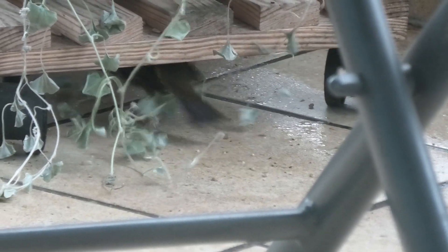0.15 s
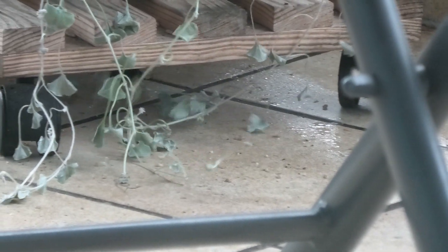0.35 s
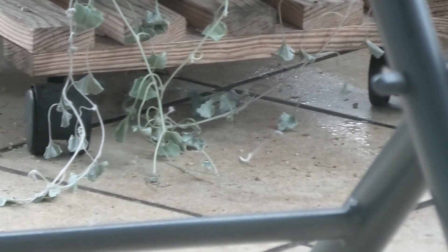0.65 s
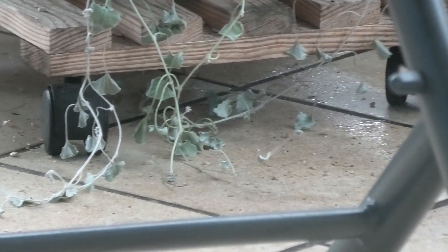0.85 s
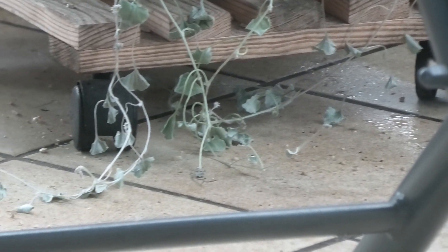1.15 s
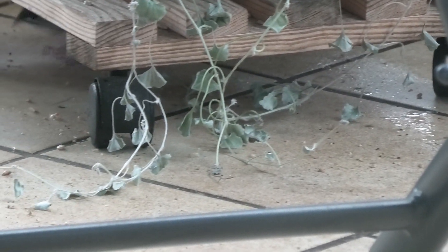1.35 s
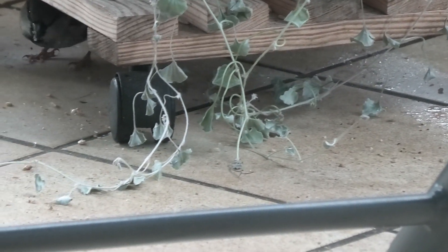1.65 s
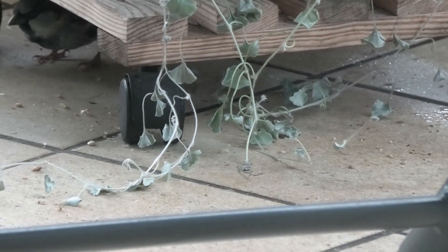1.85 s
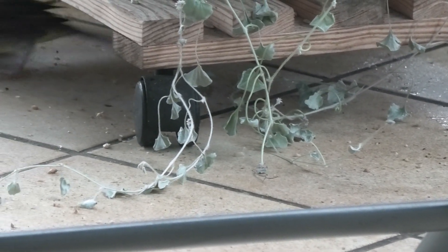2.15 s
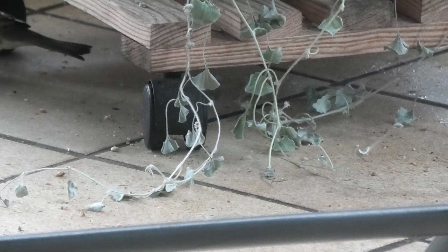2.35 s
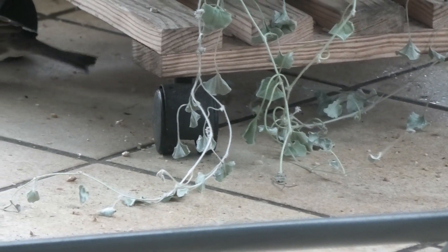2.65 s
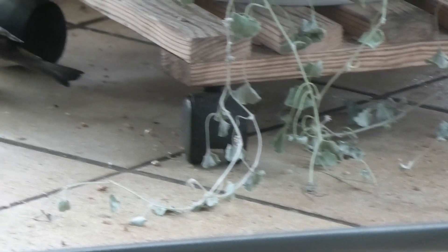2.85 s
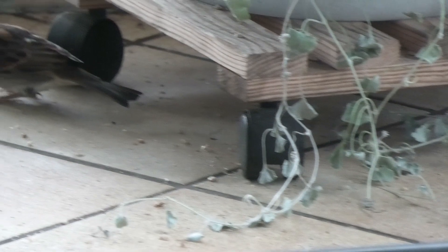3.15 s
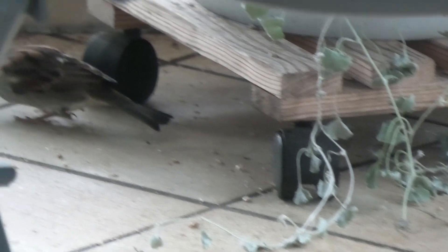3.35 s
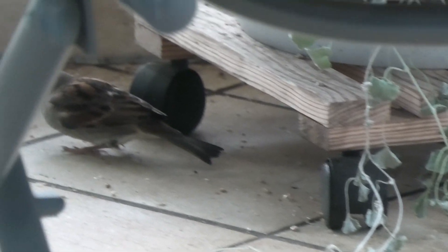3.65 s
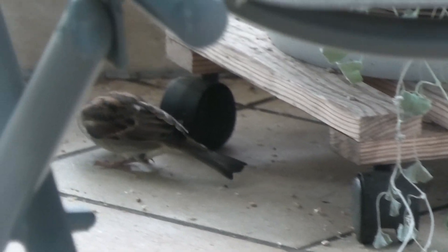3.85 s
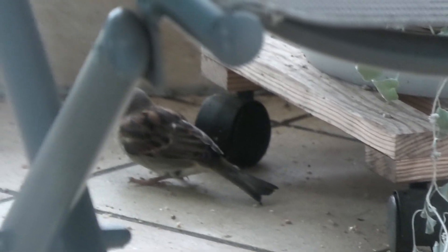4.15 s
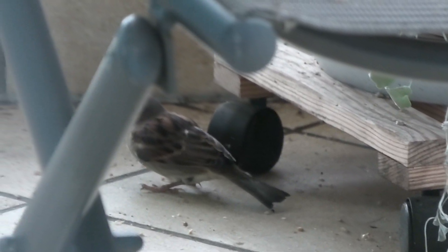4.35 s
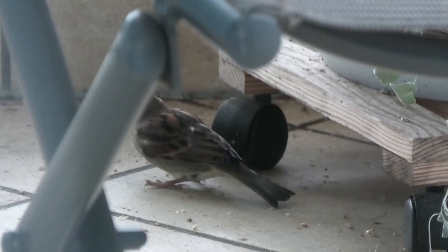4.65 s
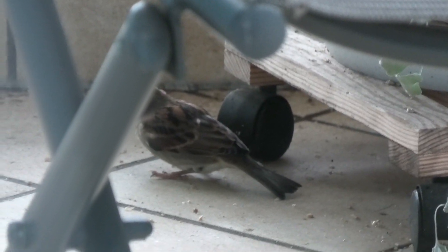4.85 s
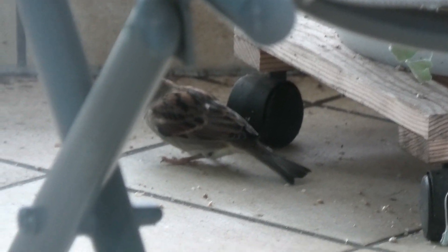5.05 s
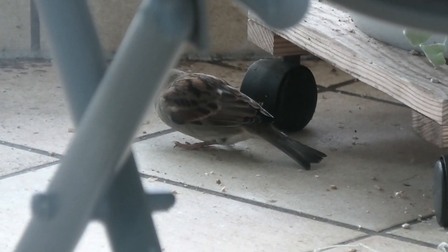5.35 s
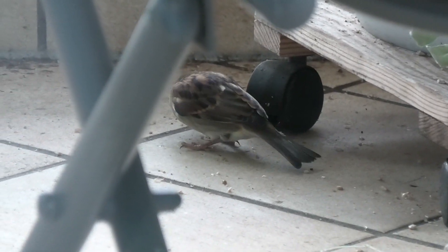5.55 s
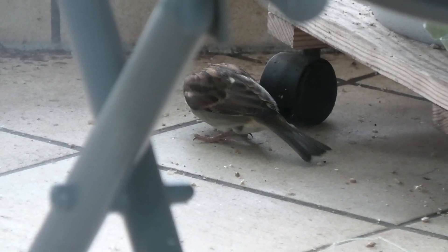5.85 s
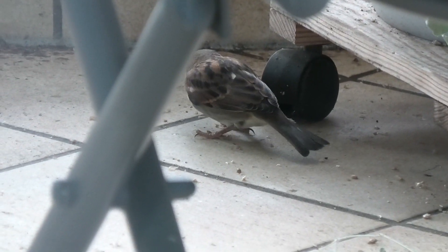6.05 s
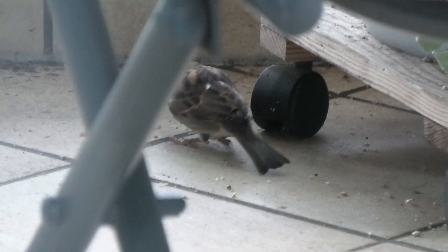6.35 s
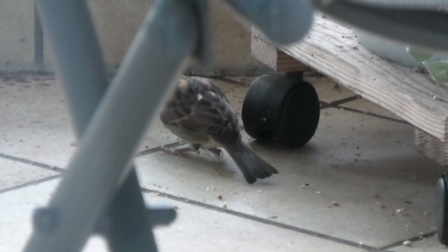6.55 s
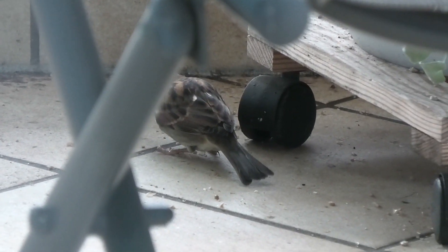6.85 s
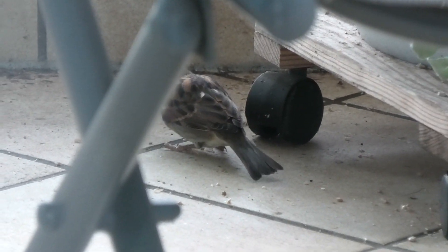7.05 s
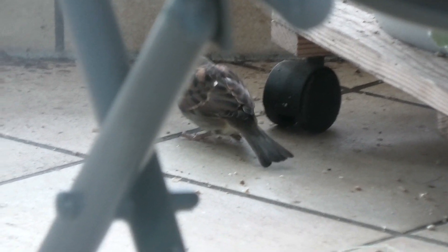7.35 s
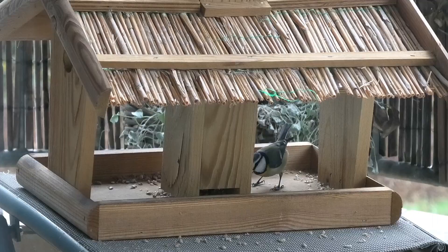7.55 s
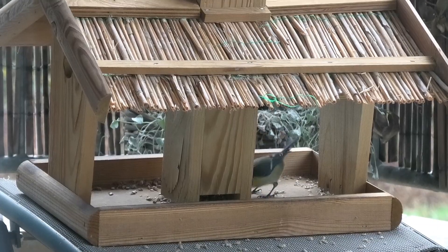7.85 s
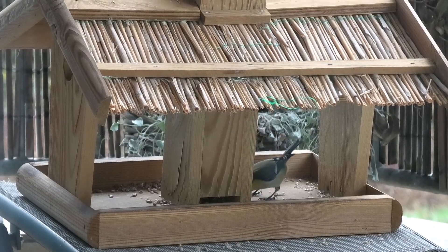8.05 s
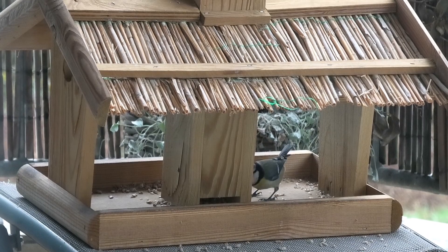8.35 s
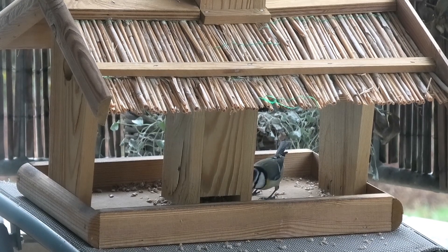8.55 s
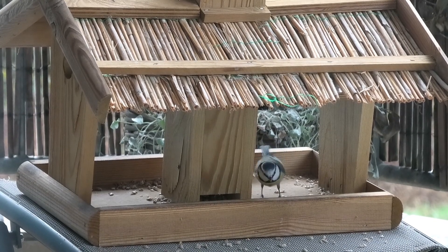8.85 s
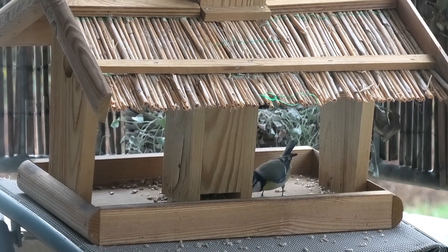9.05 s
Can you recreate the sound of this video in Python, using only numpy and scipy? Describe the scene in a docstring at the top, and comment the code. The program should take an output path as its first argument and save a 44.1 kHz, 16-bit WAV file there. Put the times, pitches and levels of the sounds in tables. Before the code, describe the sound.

Outdoor stereo ambience on a tiled balcony, with a soft low hush of distant town and leaves. From 0 to 1.6 s a bird repeats a springy looping chirp about five times a second, with tiny clipped notes and very high sizzles between. From 1.1 to 2.7 s come quick chatter, thin high whistles, trills and a long falling glide. From 2.7 to 3.7 s it is quieter: faint distant twitter and small grainy scuffs, the sharpest at 3.64. At 3.9-4.8 s sharp peeps and hooked chirps alternate. A mellow, rounded blackbird phrase flutes from 5.1 to 6.6 s, joined by rapid ticking from 5.9, then stuttering warbles and raspy squeaks until 7.6. There the hush abruptly changes character. Thin high arched tit calls follow until 8.35, then a brief lull, and from 8.5 to 9 s a crisp burst of whipping chirps and twitter.

```python
"""Songbirds sing around a balcony: several repeat loops, hooks and whips in bursts, a blackbird flutes, others
whistle, trill and twitter. Each note is a gliding syrinx tone with overtones, some with a little hiss.
The garden answers every note, and the house wall answers all but the blackbird's.
Something scuffs on the tiles as shaped noise; a soft outdoor hush of coloured noise lies under it all."""
import sys
import numpy as np
from scipy import signal
from scipy.fft import rfft, irfft, next_fast_len
from scipy.io import wavfile
from scipy.ndimage import uniform_filter1d

SR = 44100
rng = np.random.default_rng(int(sys.argv[2]) if len(sys.argv) > 2 else 0)


def output_pcm(signal):
    """Save a mono or channel-first signal as 16-bit PCM at the path in sys.argv[1].

    Samples are clipped to [-1, 1] before scaling.
    """
    pcm = np.clip(np.atleast_2d(signal).T, -1, 1) * 32767
    wavfile.write(sys.argv[1], SR, np.round(pcm).astype(np.int16))


N = 405279

TOP_HZ = 15800  # upper edge of overtones and of the final low-pass
ONSET_DB, ENDING_DB = -16, -16  # a held note starts and ends this far under its held level
CONTOUR_POINTS = 200


def undb(db):
    """Decibels to gain."""
    return 10 ** (np.asarray(db) / 20)


def unit(x):
    """Scale to rms 1."""
    return x / np.sqrt(np.mean(x ** 2))


def add(bus, x, start_s):
    """Mix a sound into a bus at a time."""
    at = int(round(start_s * SR))
    first, last = max(at, 0), min(at + x.shape[-1], N)
    bus[..., first:last] += x[..., first - at:last - at]


def walk(size, rate):
    """Random values joined by lines, rate of them a second."""
    place = np.arange(size) * rate / SR
    points = rng.standard_normal(4096)
    return np.interp(place, np.arange(len(points)), points)


def colour(points, hz):
    """Gain of a (Hz, dB) spectrum at given frequencies."""
    f, db = np.transpose(points)
    return undb(np.interp(np.log(hz + 1), np.log(f), db))


def sing(bus, voice, contour):
    """A syrinx tone follows its contour and wavers; bus rows are left, right and the share sent to the garden."""
    # bird voices: left minus right/dB, garden send/dB, 2nd harmonic/dB, upper harmonics before ring and tilt/dB
    voices = { "looper": (-4.5, -10.5, -43.5, -50), "chatter": (1.5, -8.5, -32, -36.5),
              "ticker": (0, -8.5, -27, -38), "whipper": (-2.5, -2.5, -11, -40),
              "blackbird": (8, -12, -41, -41), "rasp": (4.5, -8, -15, -26),
              "whistler": (10.5, -2.5, -24.5, -37), "glider": (8.5, -2, -25, -50),
              "sizzler": (-6, -6.5, -50, -50), "far": (3.5, 2, -52, -53), "tit": (4, -7.5, -45, -50),
              "nasal": (-5, -3, 4.5, 12), "scolder": (-3, -1, -33, -48), }
    # fast pitch tremble of the harsh voices: depth/share of pitch, rate/Hz
    harsh = {"rasp": (.035, 900), "sizzler": (.028, 1500), "whipper": (.025, 900), "ticker": (.012, 600),
             "glider": (.009, 500), "far": (.014, 250), "scolder": (.02, 1500), "tit": (.009, 120),
             "chatter": (.012, 400), "whistler": (.006, 400)}
    # hiss of air through the beak: level before its band filter, against the tone/dB
    air_db = {"blackbird": -32, "rasp": -12, "chatter": -34, "ticker": -26, "whipper": -18}
    ring_hz, ring_width_hz, ring_db = 10500, 1300, 15  # overtones ring in the beak
    blur_rad, blur_hz = .45, 1100  # phase jitter makes overtones breathy
    wall_delay_s, wall_db = (.011, .0071), -13  # echo at the left and right ear

    pan_db, echo_db, second_db, upper_db = voices[voice]
    wobble, wobble_hz = harsh.get(voice, (.003, 300))  # clear voices barely waver
    s, pitch, level_db = np.transpose(contour)
    t = np.arange(s[0], s[-1], 1 / SR)
    glide = uniform_filter1d(np.interp(t, s, pitch), size=90)
    hz = glide * (1 + wobble * walk(len(t), wobble_hz))
    phase = 2 * np.pi * np.cumsum(hz) / SR
    tone = np.sin(phase) * np.minimum(hz / 1600, 1) ** 12  # a small beak radiates no low fundamental

    for k in range(2, 7):
        ring = ring_db * np.exp(-((k * hz - ring_hz) / ring_width_hz) ** 2)
        overtone_db = second_db if k == 2 else upper_db + ring - 0.58 * k
        grain_db = 4 * walk(len(t), 500)  # overtones are raspier than the fundamental
        blur = blur_rad * walk(len(t), blur_hz)
        overtone = np.sin(k * phase + blur) * (k * hz < TOP_HZ)
        tone += undb(overtone_db + grain_db) * overtone

    if voice in air_db:
        band = signal.butter(2, (6000, 11500), "bandpass", fs=SR, output="sos")
        tone += undb(air_db[voice]) * signal.sosfilt(band, rng.standard_normal(len(t)))

    # the valve opens and shuts within a couple of milliseconds; air pressure flutters
    valve = np.clip(np.minimum(t - t[0], t[-1] - t) / .002, 0, 1)
    flutter_db = 1.2 * walk(len(t), 130)
    tone *= valve * undb(np.interp(t, s, level_db) + flutter_db)
    heard = undb([[pan_db / 2], [-pan_db / 2], [echo_db]]) * tone
    add(bus, heard, s[0])
    if voice != "blackbird":  # the blackbird arrives without a wall echo
        for ear, delay in enumerate(wall_delay_s):
            add(bus[ear], undb(wall_db) * heard[ear], s[0] + delay)


def repeated_syllables(bus):
    """Each syllable is a fixed bend of syrinx pitch and level, repeated on a beat or in a loose rhythm."""
    # syllables by name: voice, then rows of t after the start/ms, f/Hz, level before the gain below/dB
    syllables = { "loop": ("looper", [(0, 2100, -17), (10, 1950, -34), (18.4, 2180, -21), (29, 2750, -14),
                 (42, 3180, -16), (52.4, 3200, -19), (62.4, 2900, -29), (70, 2350, -19),
                 (83.4, 1914, -30)]), "arch": ("chatter", [(0, 1900, -39), (5, 2300, -15), (9, 2300, -40),
                 (14.2, 3000, -17.5), (17.3, 2350, -20), (25, 2720, -22), (48, 3030, -20),
                 (65.5, 2950, -23), (70.7, 2580, -13), (82.3, 2050, -31.5)]),
                 "dip": ("chatter", [(0, 2750, -27), (11, 3300, -29), (18.5, 2450, -17.5),
                 (25.4, 2950, -26)]), "sizz": ("sizzler", [(0, 13200, -50), (12, 13750, -34),
                 (30, 13600, -27), (45.2, 12000, -40.5), (65, 13200, -37)]),
                 "peep": ("chatter", [(0, 3560, -24), (13.7, 3530, -15.5), (21, 3480, -17),
                 (28, 3300, -36)]), "hook": ("chatter", [(0, 3400, -21), (9.2, 3150, -15),
                 (13.6, 2700, -21), (18.8, 2050, -20), (26.7, 2450, -17.5), (38.2, 2370, -27)]),
                 "tick": ("ticker", [(0, 2300, -38), (11, 3100, -27), (15, 3950, -23), (17, 3650, -15),
                 (22.5, 3500, -21), (24.5, 2600, -25), (28.4, 2550, -15), (34, 2250, -19),
                 (39.7, 1800, -24)]), "warble": ("chatter", [(0, 2300, -31), (24.2, 2650, -24),
                 (35.7, 2150, -16.5), (47.4, 2520, -23.5), (56, 2200, -14), (63.3, 2330, -19.5),
                 (82.5, 2130, -18), (87.4, 2100, -34)]), "stutter": ("chatter", [(0, 2900, -33),
                 (21, 2850, -25), (38, 2700, -35), (44, 3400, -29), (49, 3120, -18), (62, 2850, -32),
                 (67, 3300, -28), (74, 3000, -20), (84, 2750, -27)]), "zip": ("whipper", [(0, 5500, -33),
                 (13, 6500, -22), (20, 5300, -27), (30, 4600, -36)]), "whip": ("scolder", [(0, 4000, -31),
                 (8, 8300, -25), (15, 9200, -25), (25, 6500, -20), (32, 5700, -24), (42, 4600, -31)]),
                 "tut": ("looper", [(0, 3240, -28), (2.5, 2480, -21.5), (6, 2170, -18.5),
                 (11, 1800, -28.5)]), }
    # runs on a steady beat: syllable, gain/dB, first start/s, period/s, count
    runs = [ ("loop", -.5, .031, .2057, 8), ("sizz", 2.5, -.012, .2058, 8), ("arch", -2, 1.149, .122, 3),
            ("arch", -2.5, 1.764, .1315, 3), ("tick", -1, 5.929, .0872, 12), ("zip", -3, 6.748, .0635, 3),
            ("whip", -2, 8.692, .1745, 3), ("tut", 0, 8.768, .175, 3), ("tut", -7, 8.797, .175, 3), ]
    # bursts in a loose rhythm: syllable, gain/dB, starts/s
    bursts = [ ("dip", 0, [.165, .223, .350, .682, .743, .807, .874]), ("peep", -1, [4.056, 4.364, 4.508]),
              ("peep", -8, [3.923, 4.202, 4.697]), ("hook", -1, [3.953, 4.087, 4.236, 4.395, 4.540, 4.727]),
              ("stutter", .5, [6.320, 6.572, 6.845, 7.128, 7.463]),
              ("warble", 0, [6.678, 6.949, 7.240, 7.580]), ]
    steady = [(name, db, first + period * np.arange(count)) for name, db, first, period, count in runs]
    for name, gain_db, starts in steady + bursts:
        voice, shape = syllables[name]
        for start in starts:
            contour = [(start + ms / 1000, hz, db + gain_db) for ms, hz, db in shape]
            sing(bus, voice, contour)


def hold(t, attack_s, release_s):
    """Level in dB of a note that swells, holds and fades."""
    swell = np.clip(1 - t / max(attack_s, 1e-4), 0, 1)
    fade = np.clip(1 - (t[-1] - t) / max(release_s, 1e-4), 0, 1)
    return ONSET_DB * swell + ENDING_DB * fade


def slur(start, length, first_hz, middle_hz, last_hz, db, attack_s, release_s):
    """Contour of a whistle: one parabola of pitch, with attack, hold and release."""
    u = np.linspace(0, 1, CONTOUR_POINTS)
    bend = 4 * u * (1 - u)
    hz = first_hz + (last_hz - first_hz) * u + (middle_hz - (first_hz + last_hz) / 2) * bend
    return np.column_stack([start + u * length, hz, db + hold(u * length, attack_s, release_s)])


def slurred_whistles(bus):
    """Single whistles, each one smooth bend of syrinx pitch."""
    # whistles: voice, start/s, length/s, first f/Hz, middle f/Hz, last f/Hz, held level/dB, attack/s, release/s
    whistles = [ ("whistler", 0, .055, 4640, 4420, 4260, -26, .003, .03),
                ("whistler", 1.22, .105, 5640, 5870, 5720, -24, .065, .012),
                ("nasal", 1.652, .048, 1315, 1414, 1100, -45, .005, .005),
                ("glider", 1.67, .29, 5400, 5400, 5330, -37, .01, .01),
                ("glider", 1.69, .2, 5860, 5930, 5930, -33, .01, .01),
                ("glider", 2.11, .61, 9180, 7330, 6150, -20.5, .11, .26),
                ("far", 2.36, .18, 2250, 2140, 2010, -44, .03, .02),
                ("far", 2.71, .13, 2414, 2320, 2226, -40, .01, .04),
                ("far", 2.783, .022, 4700, 4620, 4450, -32, .009, .012),
                ("far", 3.1, .2, 1980, 2020, 2010, -46.5, .04, .04),
                ("far", 3.325, .055, 2520, 2230, 2200, -37, .004, .04),
                ("far", 3.6, .3, 1870, 2110, 2030, -42, .04, .08),
                ("far", 3.685, .065, 7340, 6500, 5700, -39, .005, .005),
                ("far", 3.805, .095, 5200, 3700, 4170, -35, .005, .01),
                ("far", 3.98, .11, 3400, 4150, 4160, -32.5, .04, .01),
                ("far", 4.14, .28, 4890, 4500, 4430, -40, .01, .15),
                ("looper", 4.875, .105, 4200, 3900, 4150, -25.5, .06, .045),
                ("blackbird", 5.127, .05, 1900, 2000, 2030, -25, .025, .02),
                ("blackbird", 5.182, .047, 2720, 2130, 1970, -18, .006, .014),
                ("whistler", 5.42, .074, 3600, 3030, 4200, -21, .035, .008),
                ("blackbird", 5.665, .08, 2800, 2580, 2370, -13.5, .028, .04),
                ("blackbird", 5.816, .02, 1960, 1980, 1940, -15.5, .004, .008),
                ("blackbird", 5.837, .094, 2040, 2050, 2040, -10.5, .012, .008),
                ("blackbird", 5.93, .078, 2010, 2055, 2040, -10.5, .025, .022),
                ("blackbird", 6.065, .08, 1910, 1667, 1590, -20.5, .025, .035),
                ("blackbird", 6.199, .139, 1990, 2050, 1910, -13.5, .012, .025),
                ("blackbird", 6.399, .048, 2450, 2510, 2350, -9.5, .035, .006),
                ("rasp", 6.44, .2, 2517, 2380, 2230, -30, .005, .02),
                ("blackbird", 5.59, .028, 1850, 2020, 2150, -23, .01, .01),
                ("chatter", 5.626, .042, 4750, 4430, 4150, -34, .004, .03),
                ("rasp", 5.778, .092, 1890, 1950, 1990, -28, .01, .005),
                ("rasp", 6.976, .08, 5400, 5620, 3900, -22, .04, .03),
                ("whipper", 6.994, .066, 7200, 6000, 8600, -25, .008, .003),
                ("whistler", 7.035, .032, 2900, 3600, 4400, -24, .025, .002),
                ("whistler", 7.065, .08, 4420, 4200, 3250, -18.5, .004, .035),
                ("scolder", 8.571, .034, 4300, 2400, 2000, -17, .008, .018),
                ("chatter", 8.92, .04, 4000, 4050, 4020, -29, .02, .012),
                ("chatter", 8.995, .04, 3990, 4040, 3990, -27, .014, .018), ]
    for voice, *row in whistles:
        sing(bus, voice, slur(*row))


def trill(start, length, first_hz, last_hz, db, rate, swing):
    """Contour of a trill: an even vibrato on a straight glide, quietest where the pitch is highest."""
    attack_s, release_s, throb_db = .012, .008, 3
    t = np.linspace(0, length, CONTOUR_POINTS)
    vibrato = np.cos(2 * np.pi * rate * t)
    hz = (first_hz + (last_hz - first_hz) * t / length) * (1 + swing * vibrato)
    level_db = db - throb_db * vibrato + hold(t, attack_s, release_s)
    return np.column_stack([start + t, hz, level_db])


def trilled_notes(bus):
    """Trills, whose pitch and level swing together about a glide."""
    # trills: voice, start/s, length/s, first f/Hz, last f/Hz, mean held level/dB, swing rate/Hz, swing/share of f
    trills = [ ("whistler", 1.312, .125, 6650, 6180, -35, 26, .012),
              ("whistler", 1.432, .085, 6180, 6380, -30, 26, .014),
              ("whistler", 1.52, .148, 5310, 5260, -20, 28.5, .017),
              ("chatter", 2.66, .13, 3800, 3850, -39, 29, .06),
              ("chatter", 2.81, .26, 3500, 3350, -41, 24, .09),
              ("blackbird", 6.542, .075, 2200, 1920, -17, 62, .04),
              ("far", 3.04, .24, 3700, 3550, -50, 28, .07), ("far", 3.35, .12, 7400, 8200, -45, 32, .06),
              ("far", 3.5, .1, 7900, 8600, -44, 32, .04), ("far", 5.11, .25, 4100, 3950, -44, 36, .13),
              ("blackbird", 5.295, .118, 2610, 2280, -17.5, 38.5, .07),
              ("blackbird", 5.403, .082, 2150, 2145, -14.5, 38.5, .018),
              ("blackbird", 5.536, .138, 2900, 2760, -20.5, 90, .02),
              ("blackbird", 6.445, .067, 2160, 2110, -16, 40, .05),
              ("chatter", 8.632, .075, 3450, 3700, -27, 38, .07),
              ("chatter", 8.753, .07, 3550, 3950, -24, 50, .11), ]
    for voice, *row in trills:
        sing(bus, voice, trill(*row))


def arch(start, length, top_hz, db):
    """Contour of a tit's call: a quick scoop up and a slow fall, thinned out at high pitch."""
    foot_hz, end_hz, top_share = 5600, 6500, .42  # pitch at either end; share of the call before its top
    thin_above_hz, thin_db_per_hz, edge_s = 7600, .014, .008
    u = np.linspace(0, 1, CONTOUR_POINTS)
    rise = np.maximum(1 - u / top_share, 0)
    fall = np.maximum((u - top_share) / (1 - top_share), 0)
    hz = top_hz - (top_hz - foot_hz) * rise ** 2.6 - (top_hz - end_hz) * fall ** 1.6
    thin_db = thin_db_per_hz * np.maximum(hz - thin_above_hz, 0)
    return np.column_stack([start + u * length, hz, db - thin_db + hold(u * length, edge_s, edge_s)])


def tit_calls(bus):
    """The tit's thin arched calls."""
    # calls: start/s, length/s, top f/Hz, held level before thinning/dB
    calls = [(7.697, .068, 7800, -41), (7.83, .125, 8100, -38), (8.002, .143, 8500, -37),
             (8.197, .148, 7450, -37)]
    for row in calls:
        sing(bus, "tit", arch(*row))


def songs():
    """All the single notes and syllables on one bus."""
    bus = np.zeros((3, N))
    repeated_syllables(bus)
    slurred_whistles(bus)
    trilled_notes(bus)
    tit_calls(bus)
    return bus


def twitter():
    """Far birds run through quick overlapping falling notes of random pitch, mostly heard as echo."""
    # flurries: start/s, end/s, centre f/Hz, pitch swing/share of f, typical note level before the bus trim/dB
    flurries = [(.87, 1.1, 8200, 0.049, -49), (2.657, 3.024, 3750, 0.16, -47),
                (3.005, 3.277, 3700, 0.09, -52), (3.348, 3.609, 8000, 0.11, -49),
                (3.9, 4.25, 4200, 0.12, -49), (4.547, 5.45, 6900, 0.2, -52), (5.081, 5.35, 4105, 0.25, -49),
                (5.79, 5.87, 6500, 0.25, -42), (6.442, 6.63, 2647, 0.187, -31.5),
                (8.457, 8.57, 3540, 0.1, -45), (8.565, 8.6, 3900, 0.25, -33),
                (8.626, 8.871, 3850, 0.12, -42), (8.879, 9.047, 3800, 0.087, -43)]
    step_s = .014
    bus = np.zeros((3, N))
    for start, end, hz, swing, db in flurries:
        chance = rng.standard_normal((60, 3))  # at most 60 notes each
        for beat, (late, high, loud) in zip(np.arange(start, end, step_s), chance):
            s = beat + .004 * late
            centre = hz * (1 + swing * high / 2)
            peak_db = db + 3 * loud
            sing(bus, "far", [
                (s, centre * (1 + swing / 2), peak_db - 8),
                (s + .01, centre, peak_db),
                (s + .022, centre * (1 - swing / 2), peak_db - 5),
            ])
    return bus * undb([[-1], [-1], [1]])  # a little less direct, a little more garden


def scuffs():
    """Short grainy rubs on the tiles: noise through a broad resonance, pushed and let go."""
    # rubs: start/s, rise/s, fade/s, centre f/Hz, width/Hz, level/dB
    rubs = [(2.79, 0.028, 0.046, 1080, 450, -36.5), (2.98, 0.088, 0.12, 890, 300, -39),
            (3.33, 0.087, .09, 575, 250, -35.5), (3.638, 0.012, 0.052, 1130, 600, -31),
            (3.637, .02, 0.052, 365, 299, -34), (3.637, 0.015, 0.03, 8300, 7000, -27)]
    bus, t = np.zeros((3, N)), np.arange(SR // 2) / SR
    f = np.fft.rfftfreq(len(t), 1 / SR) + 1
    for start, rise, fade, hz, width, db in rubs:
        resonance = 1 / (1 + ((f - hz * hz / f) / width) ** 2)
        rub = unit(irfft(rfft(rng.standard_normal(len(t))) * resonance ** 0.81))
        grain = undb(2.9 * walk(len(t), 203))
        push = np.sqrt(np.minimum(t / rise, 1)) * np.exp(-np.maximum(t - rise, 0) / fade)
        add(bus, undb([[0], [0], [-12]]) * rub * grain * push * undb(db), start)
    return bus


def garden(send):
    """Dense scatter from the balcony dies fast; houses and trees ring on softly."""
    near_t60_s, late_t60_s, late_db = 0.12, 0.81, -13.5  # late level against the near scatter
    t = np.arange(SR) / SR
    decay = undb(-60 * t / near_t60_s) + undb(late_db - 60 * t / late_t60_s)
    shared, own = rng.standard_normal(SR), rng.standard_normal((2, SR))
    build_up = np.minimum(t / 0.0071, 1)
    response = (shared + 0.84 * own) * decay * build_up
    response /= np.sqrt(np.sum(response ** 2, axis=1, keepdims=True))
    return signal.fftconvolve(send[None], response, axes=1)[:, :N]


def hush(spectrum, db):
    """Distant town and leaves: soft noise that swells a little, partly shared by both ears."""
    # stereo width of the hush: f/Hz, side minus mid level/dB
    width = [(70, -1.5), (160, -7.5), (300, -4.5), (650, -12.5), (1500, -9), (8000, -3)]
    size = next_fast_len(N, True)
    f = np.fft.rfftfreq(size, 1 / SR)
    mid, side = rfft(rng.standard_normal((2, size))) * colour(spectrum, f)
    mid, side = irfft(mid)[:N], irfft(side * colour(width, f))[:N]
    swell_db = .5 * walk(N, 4.1)
    return np.array([mid + side, mid - side]) / mid.std() * undb(db + swell_db)


def outdoor_hush():
    """The hush grows slowly, then changes at once to another colour at 7.56 s."""
    # early hush: f/Hz, relative level/dB per Hz
    early_colour = [(18, -77), (30, -15), (50, -7.5), (65, -11), (95, -10.5), (145, -2), (180, -3.5),
                    (230, -1), (315, -5), (389, -2.5), (606, -7.5), (852, -3), (970, -7.5), (1330, -7.5),
                    (1640, -12.5), (2360, -14.5), (5890, -28), (8000, -30), (12300, -29), (15500, -29.5)]
    # later hush, from 7.56 s on: f/Hz, relative level/dB per Hz
    late_colour = [(18, -43), (30, -11.5), (243, -0.5), (432, -1.5), (1290, 0), (4910, -22), (6890, -30),
                   (8500, -26), (15500, -23)]
    early_db, feeder_db = -41.7, -40  # mid level; for the early hush, halfway through its stretch
    change_s, rise_db_per_s = 7.56, .25
    t = np.arange(N) / SR
    early_hush = hush(early_colour, early_db + rise_db_per_s * (t - change_s / 2))
    return np.where(t < change_s, early_hush, hush(late_colour, feeder_db))


def scene():
    """Birds and scuffs, their garden reverberation, over the hush."""
    bus = songs() + twitter() + scuffs()
    direct = bus[:2].copy()
    direct[1] = np.roll(direct[1], 1)  # direct sound reaches the right channel one sample later
    return direct + garden(bus[2]) + outdoor_hush()


def record(dry):
    """A steep elliptic low-pass cuts the top of the treble."""
    low_pass = signal.ellip(10, .1, 80, TOP_HZ, fs=SR, output="sos")  # ripple and stopband in dB
    return signal.sosfilt(low_pass, dry)


dry = scene()
out = record(dry)
output_pcm(out)
```